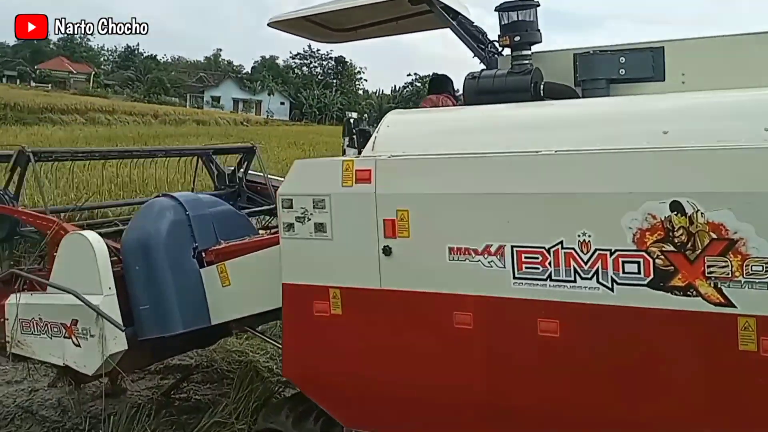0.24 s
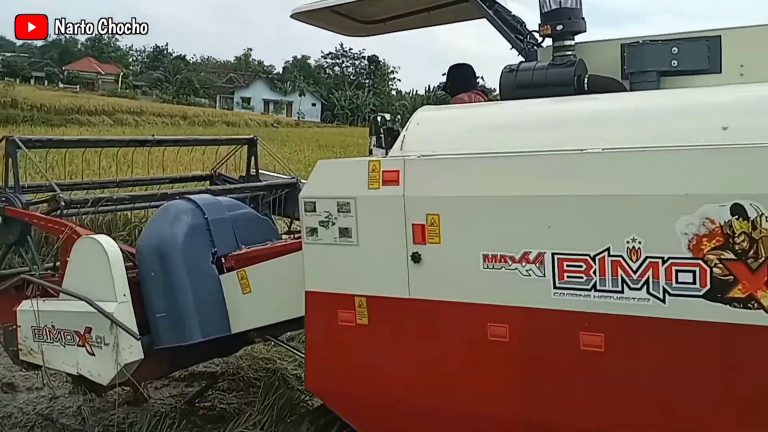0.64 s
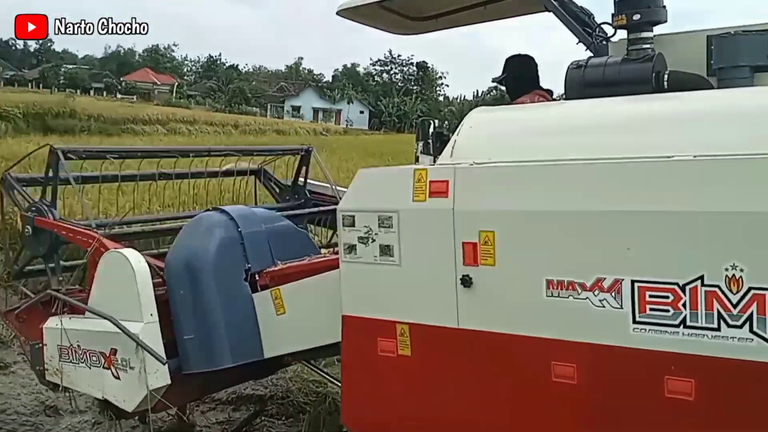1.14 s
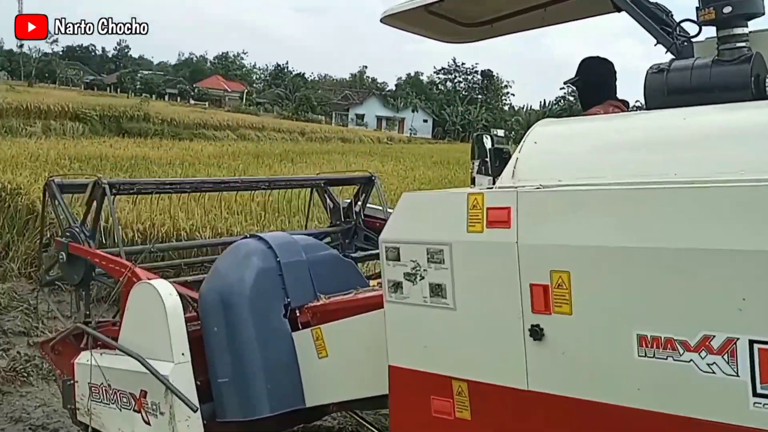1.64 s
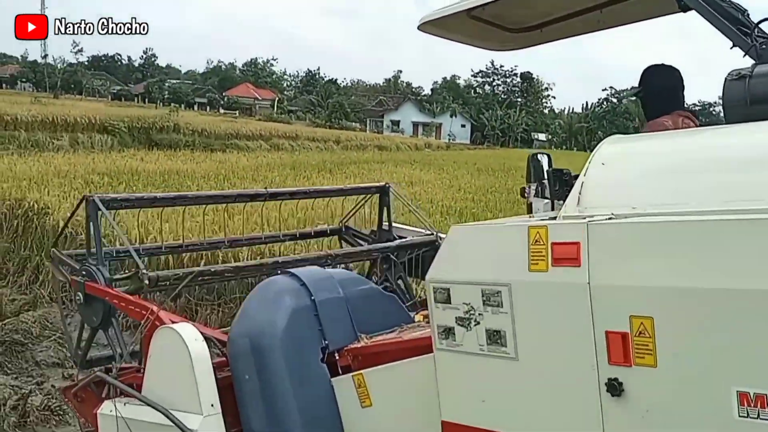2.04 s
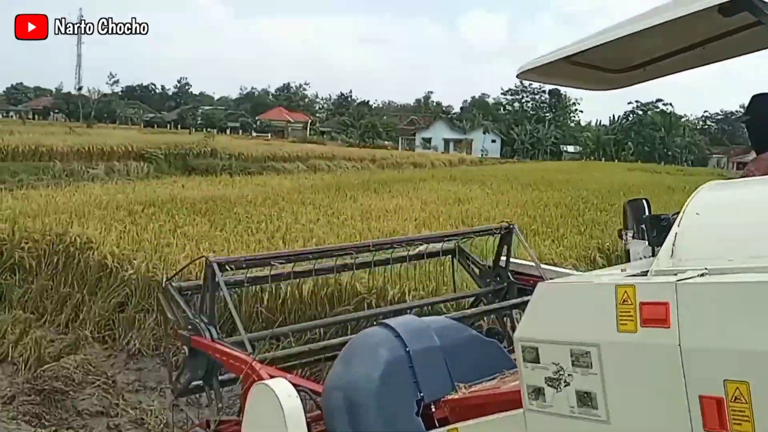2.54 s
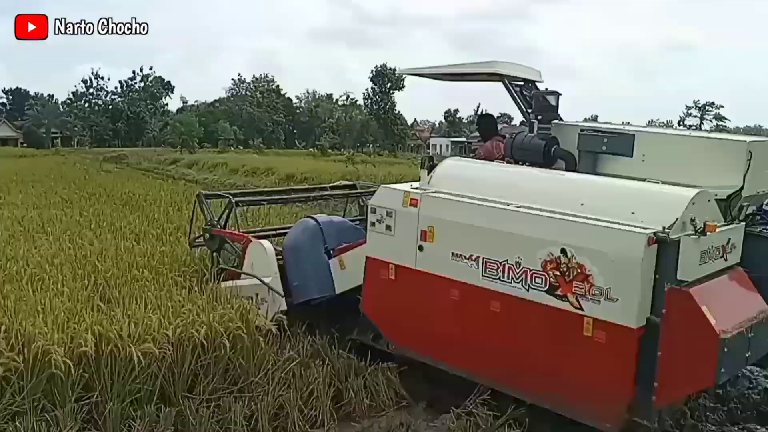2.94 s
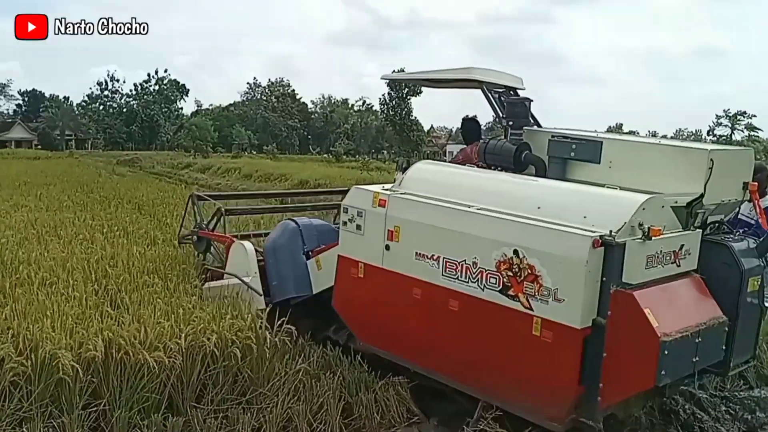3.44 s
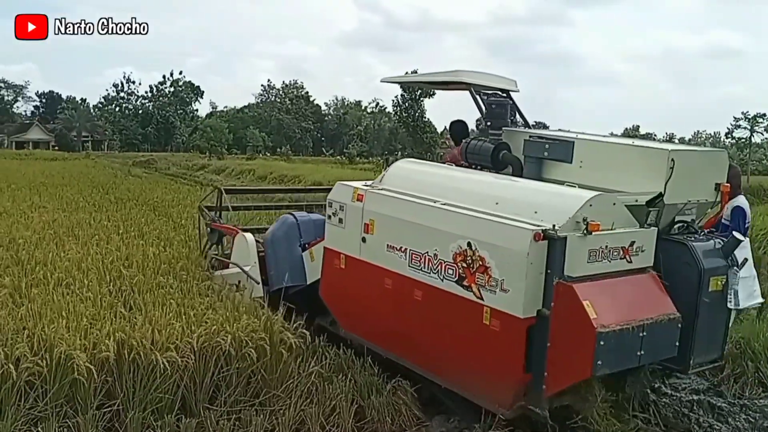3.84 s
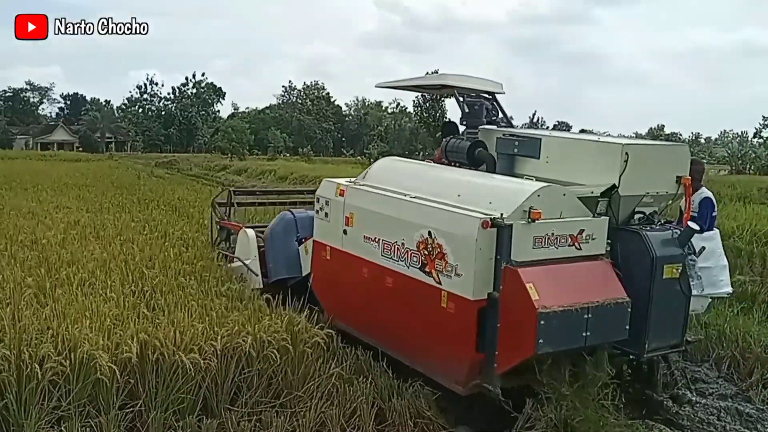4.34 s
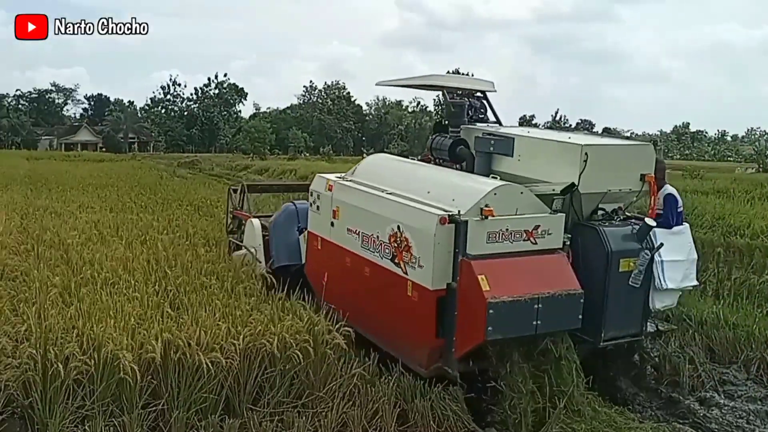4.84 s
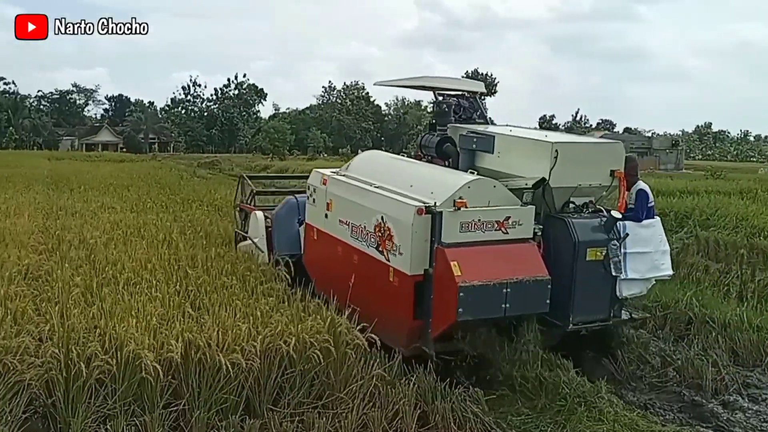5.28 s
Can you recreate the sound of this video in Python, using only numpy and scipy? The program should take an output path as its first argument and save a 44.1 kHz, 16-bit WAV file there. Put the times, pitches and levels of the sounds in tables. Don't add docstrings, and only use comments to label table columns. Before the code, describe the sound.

From 0 to 3 seconds a combine harvester runs close to one outdoor microphone. A low, steady diesel drone with buzzy overtones sits inside a thick, rushing roar of fan, drum and sieves, fluttering slightly with the turning parts. Loose metal panels rattle continuously, a narrow low whirr surfaces around 1.3 to 1.75, and a faint, very high insect hiss pulses above. Near 2.1 to 2.4 the exhaust note changes balance as the machine draws past. At 3.0 everything cuts abruptly to silence until about 3.36, then fades in over a quarter second. The harvester is now farther away, its engine slightly lower, with several fuzzy belt and gear tones from 3.6 to 4.5. Its fan hiss dulls as it turns, and the roar's colour shifts at 4.5. Isolated wind pops start around 3.65; from 4.5 to 5.5 low thumps cluster, momentarily pushing the level down.

```python
import sys
import numpy as np
from scipy import signal
from scipy.fft import rfft, irfft
from scipy.io import wavfile
from scipy.ndimage import uniform_filter1d

SR = 44100
rng = np.random.default_rng(int(sys.argv[2]) if len(sys.argv) > 2 else 0)


def unload_audio(sound):
    columns = np.transpose(np.atleast_2d(sound))
    steps = np.round(np.clip(columns, -1, 1) * 32767)
    wavfile.write(sys.argv[1], SR, steps.astype(np.int16))


def linear_from_db(decibels):
    return 10 ** (np.asarray(decibels, float) / 20)


N = 242991

# time_s, firing_hz
FIRING_RATE = [
    (0, 86.2),
    (.75, 85.5),
    (2, 85.4),
    (2.6, 84.2),
    (3, 84),
    (3.3, 81.4),
    (4.4, 80.8),
    (5.51, 80.5),
]
# multiple, alongside_db, drawn_past_db, far_db
ENGINE_TONES = [
    (1, -26.5, -26, -30),
    (2, -23.5, -30, -27),
    (3, -33, -31, -36),
    (4, -33, -33, -36),
    (5, -33, -36, -39),
    (6, -33, -36, -39),
    (7, -33, -38, -37),
    (14, -36, -35, -50),
]
# pitch_hz, level_db_per_hz
ROAR_COLOUR = [
    [(15, -29), (25, -36.5), (67, -12.5), (176, 4.5), (213, -1.5), (373, -6), (515, -8.5), (749, -10), (1810, -11), (2130, -16.5), (3260, -20.5), (4500, -29.5), (7280, -28), (13500, -47), (15000, -38.5)],
    [(15, -56), (25, -57), (75, -1.5), (163, -7), (335, -4), (404, -14), (673, -7), (833, -14.5), (1630, -11.5), (2630, -18.5), (5420, -28), (6720, -18.5), (8550, -32.5), (13500, -42.5), (15000, -33)],
    [(15, -72), (25, -38.5), (93, -0.5), (158, -6), (309, -5), (394, -12.5), (637, -8.5), (769, -16.5), (1180, -13.5), (1500, -17), (1630, -13.5), (5280, -27), (6540, -22), (13500, -47), (15000, -47)],
]
# pitch_hz, width_hz, above_roar_db
BODY_RINGS = [
    [(169.7, 31, -6.5), (1380, 56, 2), (5700, 580, 2), (6800, 2200, 3.5), (8100, 350, -4), (796, 120, -3.5), (2100, 190, 0)],
    [(1214, 35, 6), (1700, 72, 2), (2107, 46, 7.5), (2610, 650, 4.5), (3990, 160, 3), (5230, 510, 3), (6650, 500, -1), (7500, 360, 3.5), (8110, 500, -3), (2850, 150, -0.5), (5400, 270, 2)],
    [(1130, 96, 3), (1700, 180, 2), (2060, 53, 5), (2590, 85, 3), (3100, 57, -1), (3170, 46, 6.5), (3710, 23, 9.5), (4050, 130, 4.5), (4700, 68, 3.5), (6800, 450, 1.5), (5570, 250, -4), (2300, 250, -0.5)],
]
# delay_ms, gain_ratio
GROUND_ECHO = [
    (.98, -0.014),
    (2.1, -0.011),
    (2.2, -0.021),
]
# rate_per_s, depth_db, phase_turns
SHAFT_THROBS = [
    (14.8, .8, .2),
    (5.2, .7, .6),
]
# time_s, level_db
ROAR_REACH = [(0.1, -16.5), (0.6, -17.5), (0.9, -16), (1.1, -16.5), (1.5, -15), (1.9, -17), (2.1, -14),
              (2.35, -16.5), (2.9, -14.5), (3.7, -19), (4.0, -18), (4.2, -18.5), (4.43, -16.5),
              (4.66, -18.5), (4.8, -18.5), (5.05, -17), (5.4, -18)]
# centre_s, length_s, lift_db
RUMBLE_GUSTS = [
    (0.295, 0.097, 1),
    (1.107, 0.16, 3.5),
    (3.922, 0.19, 4),
    (4.302, .09, 4),
    (4.536, 0.18, 5),
    (4.799, .14, 2.5),
    (5.14, 0.095, -1),
    (5.396, 0.12, 2.5),
]
# centre_s, length_s, lift_db
INSECT_SWELLS = [(.3, .2, 5), (.72, .15, 10), (1.05, .12, 3), (1.5, .1, 7), (2.0, 0.25, 8), (2.55, .2, 6),
                 (2.919, .25, 13.5), (3.75, 0.41, 1.5), (4.3, .14, 7), (4.79, .09, 5), (5.12, .1, 2.5)]
# start_s, end_s, pitch_hz, width_hz, level_db
BELT_WHIRRS = [
    (1.3, 1.75, 1192, 15, -32),
    (3.7, 4.25, 2660, 45, -29.5),
    (3.6, 4.15, 1640, 40, -31),
    (3.7, 4.47, 1200, 30, -31),
    (4.15, 4.54, 2065, 22, -29),
    (4.7, 5.51, 1720, 40, -30),
    (4.55, 5.51, 3020, 40, -35),
    (5.05, 5.35, 2070, 30, -33),
]
# time_s, peak_db, pitch_hz, direction (1 push, -1 pull)
WIND_POPS = [(3.6566, -6.5, 158, -1), (3.6899, -7.5, 256, 1), (3.9993, -6.5, 136, 1), (4.1959, -9, 166, 1),
             (4.4568, -10, 232, -1), (4.5125, -4.5, 178, -1), (4.5406, 1, 179, 1), (4.5494, 1, 208, 1),
             (4.5767, -2.5, 324, 1), (4.5808, -3, 171, -1), (4.663, -4.4, 266, 1), (4.7537, -9, 185, -1),
             (4.8503, -7, 200, 1), (4.9108, -5.8, 266, 1), (4.928, -2, 179, 1), (4.9939, -5, 259, 1),
             (5.0717, -7.3, 147, 1), (5.0837, -7.1, 167, 1), (5.1409, -2.0, 262, 1), (5.1944, -1, 204, 1),
             (5.2389, -6.7, 225, 1), (5.2616, -2, 240, 1), (5.2774, -3, 227, 1)]

CUT_S, BACK_S, FADE_S = 3.0168, 3.3615, .27
PASSING_S = 2.1, 2.4
TURN_S = 4.5
RUMBLE_DB, RUMBLE_PAST_DB, RUMBLE_FAR_DB = -18.5, -20.3, -20
FAN_NEAR_DB, FAN_OPENS_DB_PER_S = 0, 0.28
FAN_FACES_S, FAN_TURN_S = 3.7, 0.27
FAN_FAR_DB, FAN_AWAY_DB = 2.5, -3
RATTLES_PER_S, RATTLE_HZ, RATTLE_DB = 90, (450, 2000), -27
INSECT_HZ = 14350, 15600
CHORUS_NEAR_DB, CHORUS_FAR_DB = -54.5, -42
POP_DB = 1.5
POP_RISE, POP_SETTLE, POP_CUT_HZ = 2.2, .62, 70
EDGE_HZ = 15510


def read(points, hz):
    f, value = np.transpose(points)
    return np.interp(np.log(hz + 1), np.log(f + 1), value)


def evened(x):
    return x / np.sqrt(np.mean(abs(x) ** 2) + 1e-20)


def drift(t, top_hz):
    rates = np.geomspace(.1, 1, num=24) * top_hz
    return evened(sum(np.sin(2 * np.pi * (f * t + rng.random())) / np.sqrt(f) for f in rates))


def bells(t, rows):
    return sum(db * np.exp(-((t - s) / length) ** 2) for s, length, db in rows)


def by_view(t, near, far):
    return np.where(t < BACK_S - .1, near, far)


def grid():
    return np.fft.rfftfreq(512, 1 / SR)[:, None], np.arange(N // 128 + 5) * 128 / SR


def hiss(field_db):
    z = rng.standard_normal(field_db.shape) + 1j * rng.standard_normal(field_db.shape)
    return signal.istft(z * linear_from_db(field_db) / np.sqrt(2 * 384), nperseg=512, noverlap=384)[1][:N]


def coloured(x, view):
    hz = np.fft.rfftfreq(N, 1 / SR)
    rings = sum(db / (1 + (2 * (hz - f) / width) ** 2) for f, width, db in BODY_RINGS[view])
    delay_ms, gain = GROUND_ECHO[view]
    echo = 1 + gain * np.exp(-2j * np.pi * hz * delay_ms / 1000)
    shape = linear_from_db(read(ROAR_COLOUR[view], hz) + rings) * echo
    middle = (hz > 700) & (hz < 4000)
    return irfft(rfft(x) * shape / np.sqrt(np.mean(abs(shape * middle) ** 2)), N)


def levels(t):
    body = np.interp(by_view(t, t, t.clip(FAN_FACES_S)), *np.transpose(ROAR_REACH))
    rumble_near = np.interp(t, PASSING_S, [RUMBLE_DB, RUMBLE_PAST_DB])
    rumble = by_view(t, rumble_near, RUMBLE_FAR_DB) + bells(t, RUMBLE_GUSTS)
    turning = np.exp(-(t - FAN_FACES_S).clip(0) / FAN_TURN_S)
    fan_near = FAN_NEAR_DB + FAN_OPENS_DB_PER_S * t
    fan_far = FAN_AWAY_DB + (FAN_FAR_DB - FAN_AWAY_DB) * turning
    return body, rumble - body, by_view(t, fan_near, fan_far)


def roar():
    hz, t = grid()
    low = 1 / (1 + (hz / 500) ** 4)
    high = 1 / (1 + (4500 / (hz + 1)) ** 6)
    body, rumble, fan = levels(t)
    level = body + low * rumble + high * fan
    throb = sum(db * np.cos(2 * np.pi * (rate * t + turn) + .7 * drift(t, 1.5))
                for rate, db, turn in SHAFT_THROBS)
    patches = uniform_filter1d(rng.standard_normal((len(hz), len(t))), 7, axis=0)
    patches = uniform_filter1d(patches, 14, axis=1)
    flicker = 0.48 * evened(uniform_filter1d(rng.standard_normal(len(t)), 4))
    x = hiss(level + (1 - 0.32 * low) * throb + 0.88 * evened(patches) + flicker)
    s = np.arange(N) / SR
    turned = np.clip((s - TURN_S) / 0.027 + .5, 0, 1)
    shaded = linear_from_db(-2.5 * np.exp(-(s - TURN_S).clip(0) / 0.044))
    far = (1 - turned) * coloured(x, view=1) + turned * shaded * coloured(x, view=2)
    return by_view(s, coloured(x, view=0), far)


def engine():
    t = np.arange(N) / SR
    turns = np.cumsum(np.interp(t, *np.transpose(FIRING_RATE))) / SR
    coarse, out = t[::256], np.zeros(N)
    for k, beside_db, past_db, far_db in ENGINE_TONES:
        near_db = np.interp(t, PASSING_S, [beside_db, past_db])
        waver_db = np.interp(t, coarse, 2.2 * drift(coarse, 20))
        wander = np.interp(t, coarse, .22 * np.sqrt(k) * drift(coarse, 14))
        level = linear_from_db(np.where(t < CUT_S, near_db, far_db) + waver_db)
        out += np.sqrt(2) * level * np.cos(2 * np.pi * k * turns + wander)
    return out


def rattles():
    t, out = np.arange(6000) / SR, np.zeros(N)
    panels = np.geomspace(*RATTLE_HZ, num=30) * rng.uniform(.96, 1.04, size=30)
    for hz in panels:
        struck = rng.random(N) < RATTLES_PER_S / len(panels) / SR
        knocks = struck * linear_from_db(3.0 * rng.standard_normal(N))
        fading = linear_from_db(-60 * t / .16) * (1 - np.exp(-t / .004))
        ring = fading * np.sin(2 * np.pi * hz * t)
        out += signal.oaconvolve(knocks, ring)[:N]
    return linear_from_db(RATTLE_DB) * evened(out)


def insects():
    hz, t = grid()
    lower_edge = np.clip((INSECT_HZ[0] + 500 - hz) / 1200, 0, 3)
    band_db = -30 * lower_edge ** 2 - 80 * (hz > INSECT_HZ[1])
    pulsing = 2.2 * evened(uniform_filter1d(rng.standard_normal(len(t)), 3))
    x = hiss(band_db + pulsing)
    s = np.arange(N) / SR
    return evened(x) * linear_from_db(by_view(s, CHORUS_NEAR_DB, CHORUS_FAR_DB) + bells(s, INSECT_SWELLS))


def whirrs():
    out = np.zeros(N)
    for start, end, hz, width, db in BELT_WHIRRS:
        part = slice(int(start * SR), int(end * SR))
        t = np.arange(N)[part] / SR
        fuzz = rng.standard_normal((N, 2))[part] @ [1, 1j]
        pole = np.exp(-np.pi * width / SR)
        fuzz = evened(signal.lfilter([1], np.convolve([1, -pole], [1, -pole]), fuzz))
        tone = (fuzz * np.exp(2j * np.pi * hz * t)).real
        out[part] += np.sqrt(2) * linear_from_db(db) * tone * signal.windows.tukey(len(t), .4)
    return out


def wind():
    t, out = np.arange(N) / SR, np.zeros(N)
    for s, db, hz, push in WIND_POPS:
        part = slice(int((s - .02) * SR), int((s + .03) * SR))
        u = (t[part] - s) * hz * np.where(t[part] < s, POP_RISE, .85)
        out[part] += push * linear_from_db(db + POP_DB) * np.exp(-(u / POP_SETTLE) ** 2) * np.cos(2 * np.pi * u)
    return signal.lfilter(*signal.butter(2, POP_CUT_HZ, "high", fs=SR), out)


def scene():
    machine = linear_from_db(6.0) * roar() + engine() + whirrs() + rattles()
    return (machine + linear_from_db(0.5) * insects() + wind())[None]


def roll_off(x):
    return signal.sosfilt(signal.butter(12, 16870, fs=SR, output="sos"), x)


def record(dry):
    t = np.arange(N) / SR
    power_db = 10 * np.log10(abs(uniform_filter1d(dry[0] ** 2, 200, origin=99)) + 1e-12)
    fall = t * 60.
    held_db = np.maximum.accumulate(power_db + fall) - fall
    over_db = np.maximum(held_db + 11.5, 0)
    cut_db = .5 * np.roll(uniform_filter1d(over_db, 130, origin=64), 110)
    ducked = dry / linear_from_db(cut_db)
    fade_in = np.clip((t - BACK_S) / FADE_S + 0.041, 0, 1) * (t > BACK_S)
    edit = (t < CUT_S) + fade_in
    edge = signal.firwin(1201, EDGE_HZ, window=("kaiser", 10), fs=SR)
    squashed = np.tanh(ducked * edit * .8) / .8
    return roll_off(signal.oaconvolve(squashed, edge[None], "same"))


dry = scene()
out = record(dry)
unload_audio(out)
```